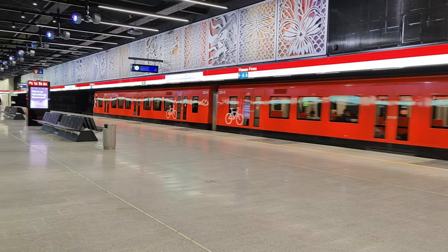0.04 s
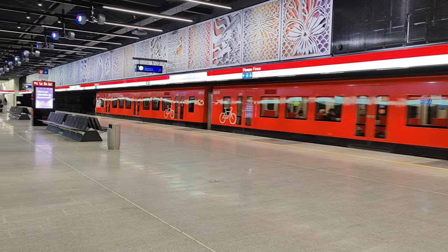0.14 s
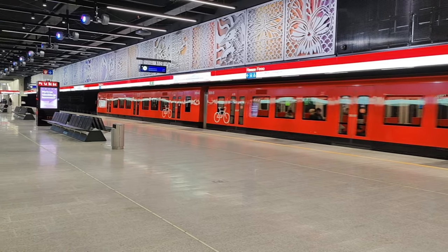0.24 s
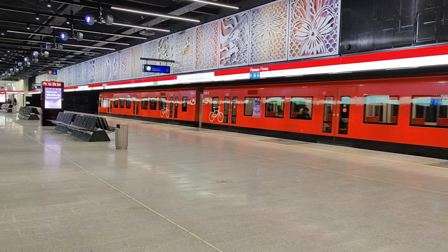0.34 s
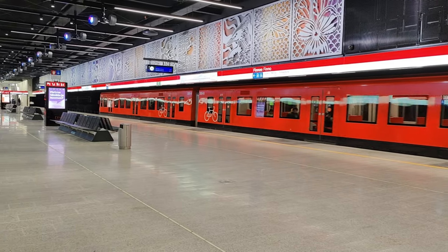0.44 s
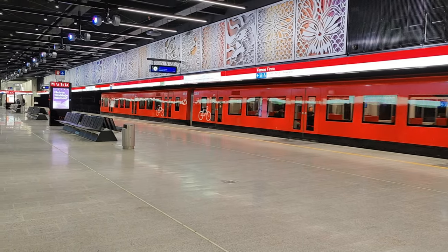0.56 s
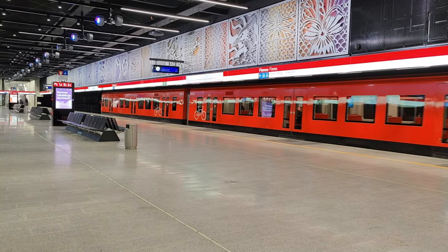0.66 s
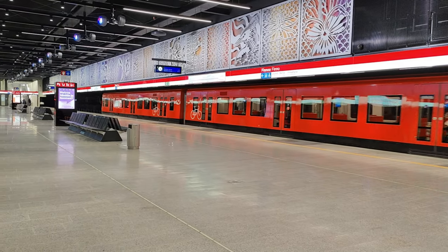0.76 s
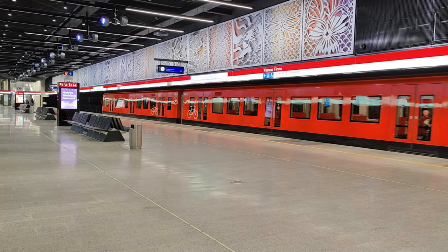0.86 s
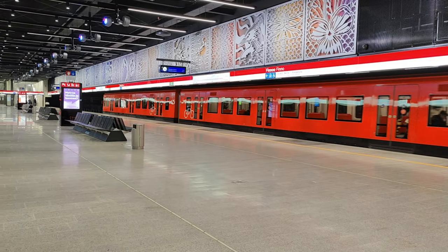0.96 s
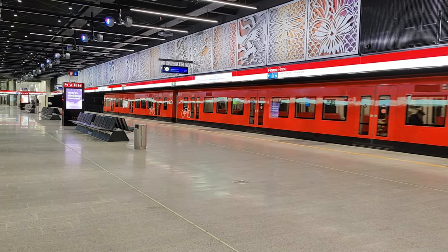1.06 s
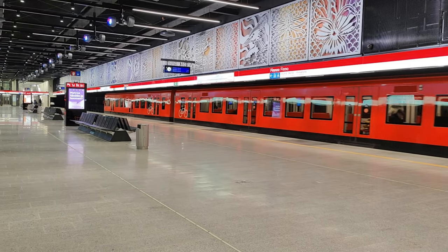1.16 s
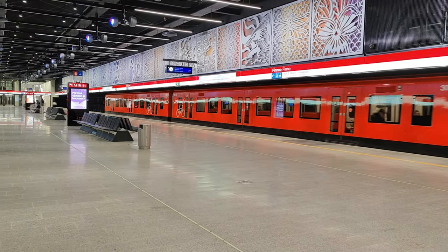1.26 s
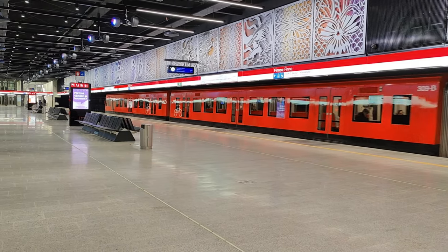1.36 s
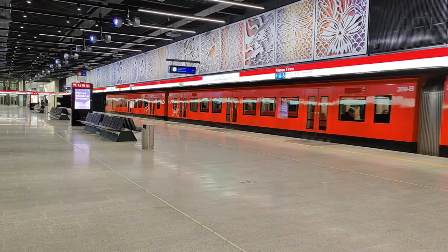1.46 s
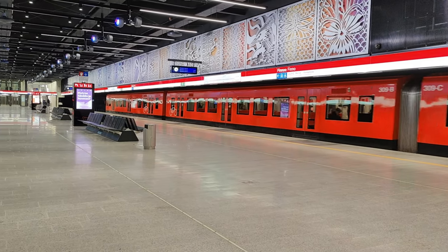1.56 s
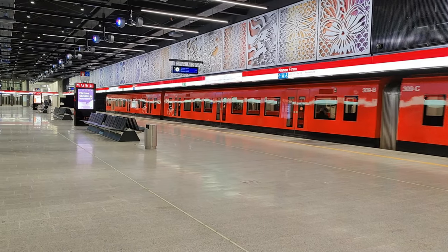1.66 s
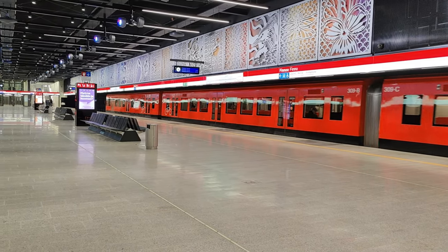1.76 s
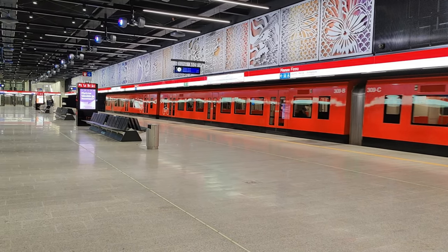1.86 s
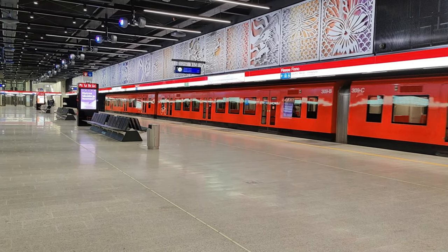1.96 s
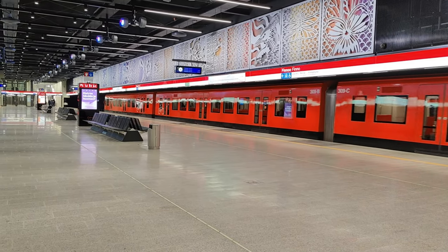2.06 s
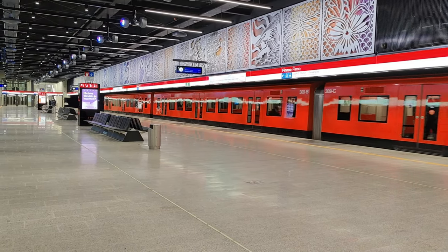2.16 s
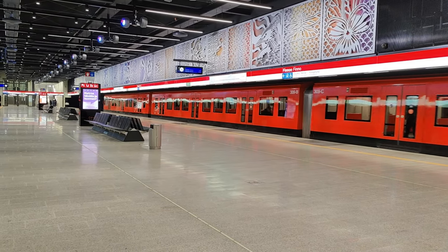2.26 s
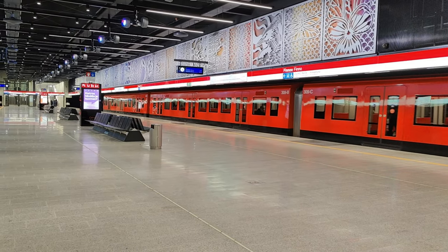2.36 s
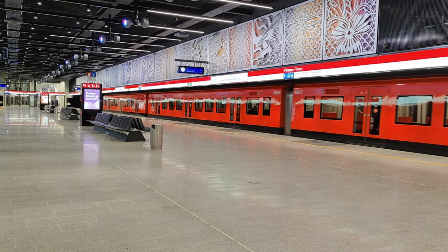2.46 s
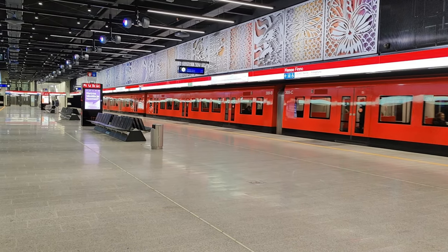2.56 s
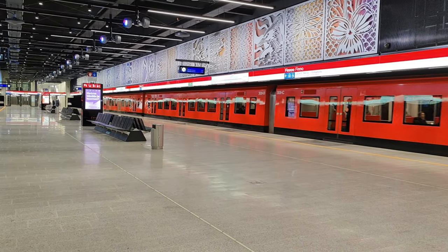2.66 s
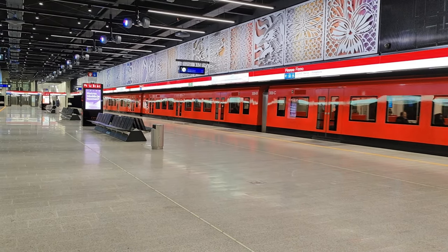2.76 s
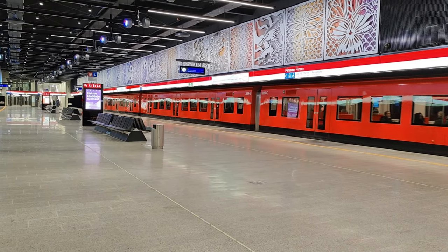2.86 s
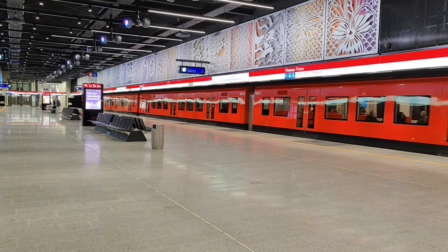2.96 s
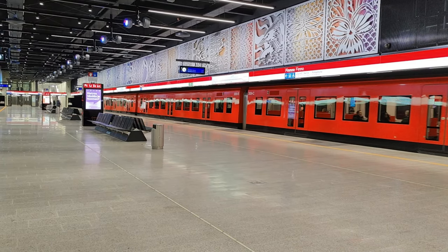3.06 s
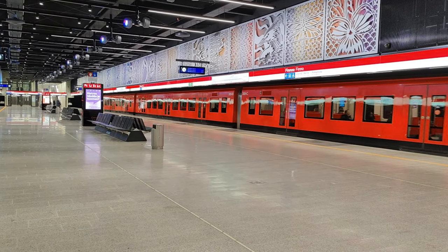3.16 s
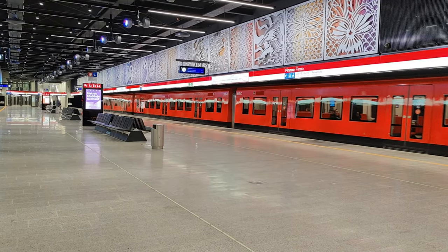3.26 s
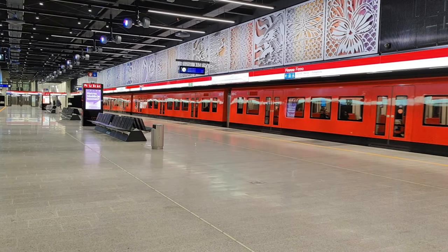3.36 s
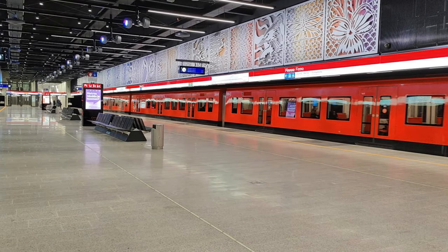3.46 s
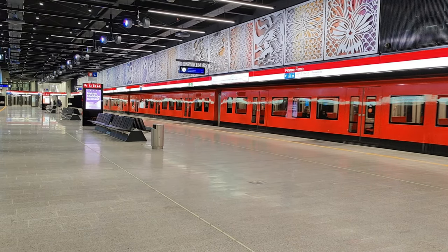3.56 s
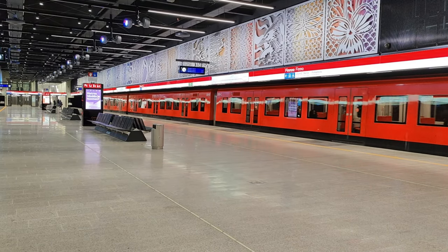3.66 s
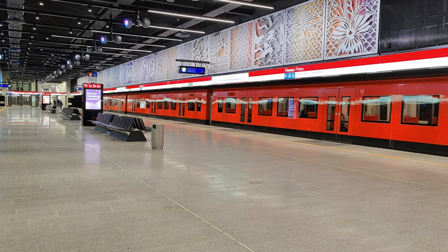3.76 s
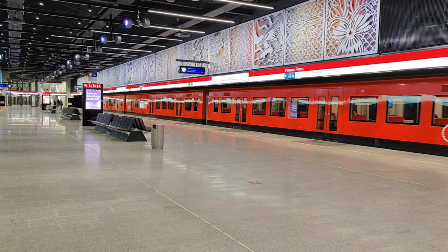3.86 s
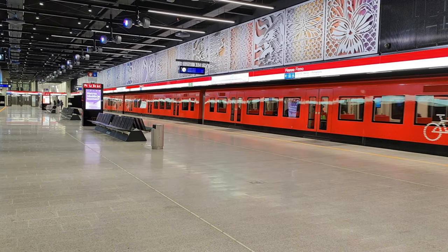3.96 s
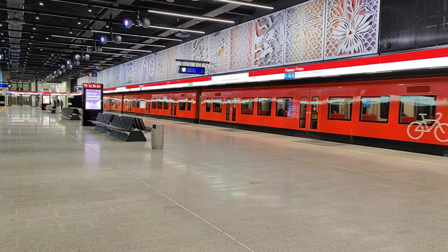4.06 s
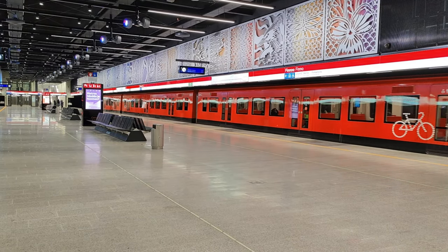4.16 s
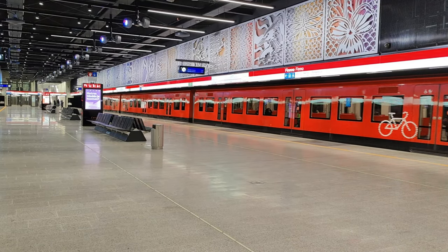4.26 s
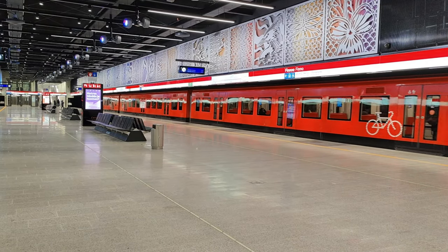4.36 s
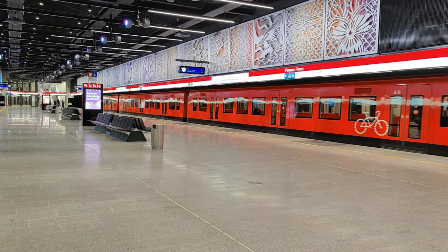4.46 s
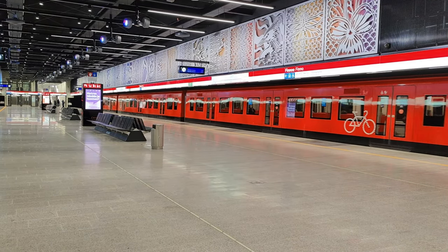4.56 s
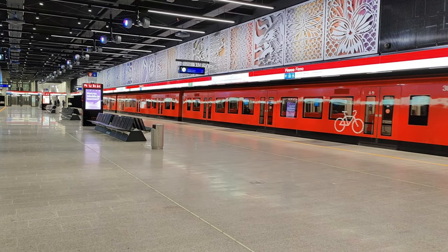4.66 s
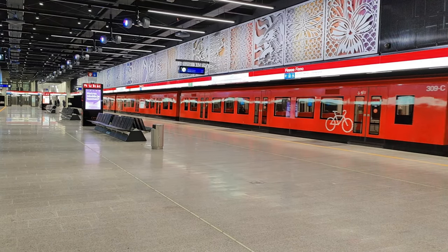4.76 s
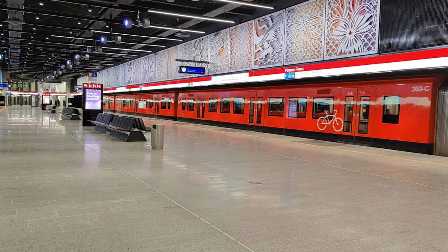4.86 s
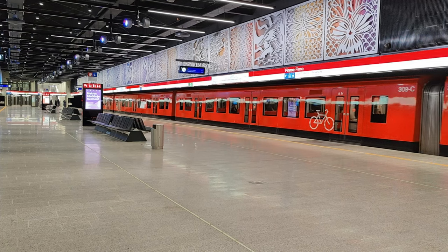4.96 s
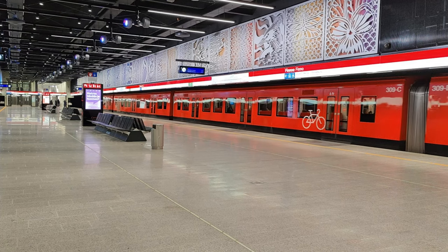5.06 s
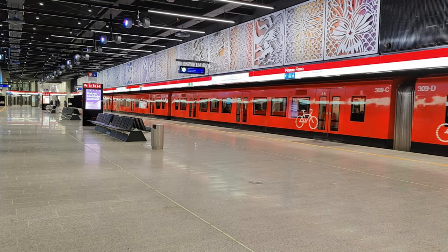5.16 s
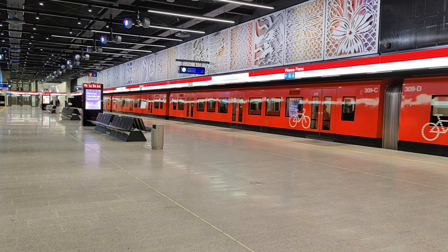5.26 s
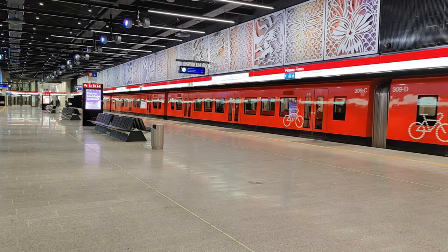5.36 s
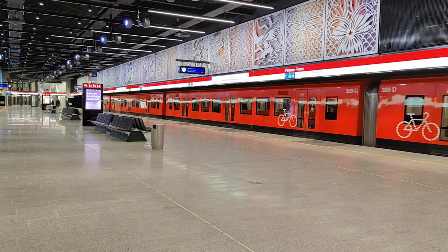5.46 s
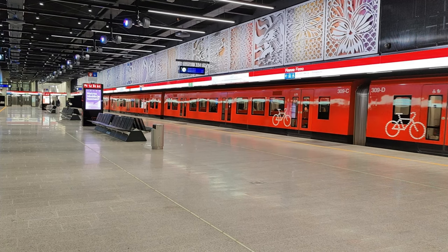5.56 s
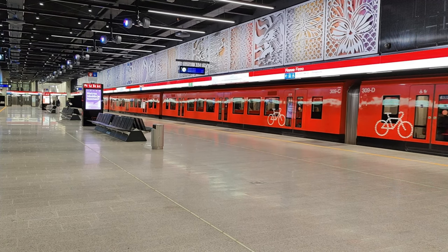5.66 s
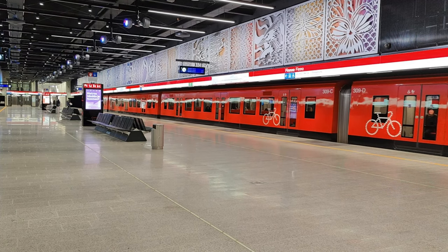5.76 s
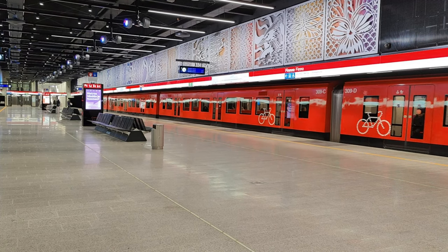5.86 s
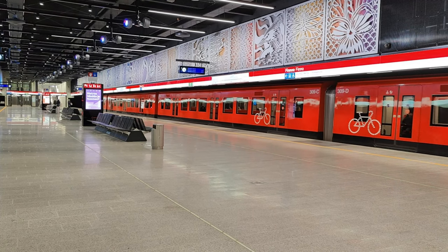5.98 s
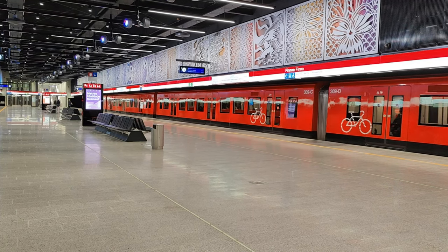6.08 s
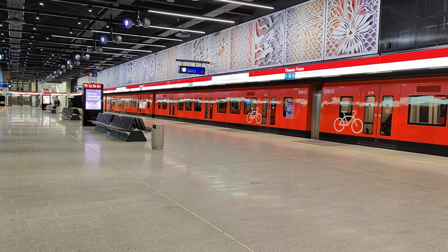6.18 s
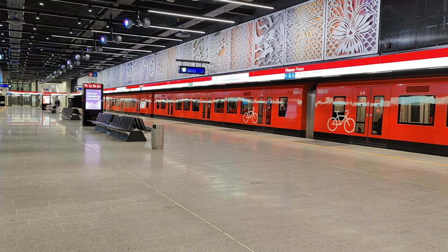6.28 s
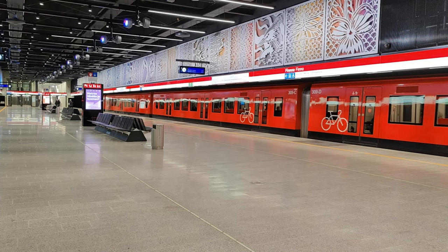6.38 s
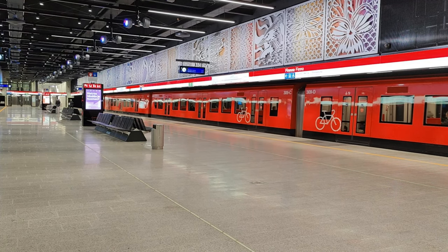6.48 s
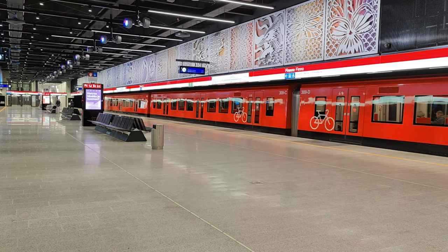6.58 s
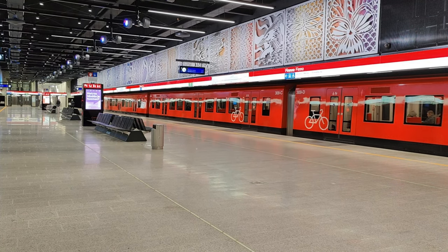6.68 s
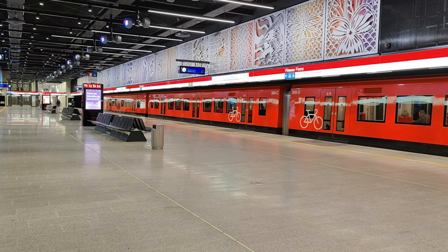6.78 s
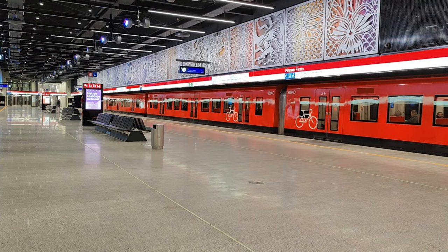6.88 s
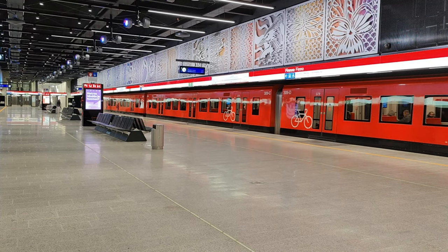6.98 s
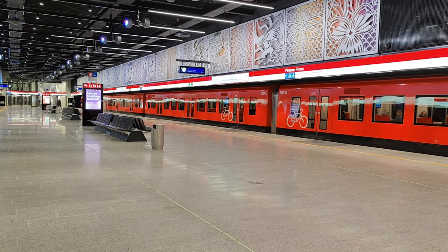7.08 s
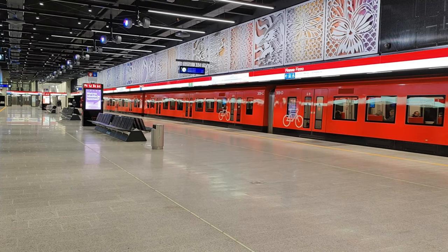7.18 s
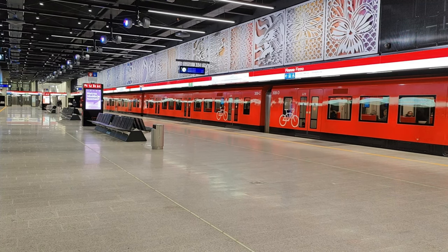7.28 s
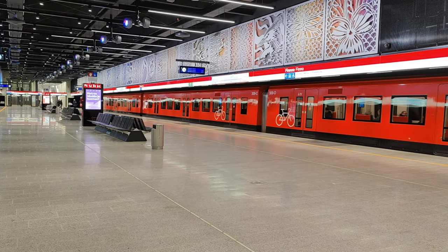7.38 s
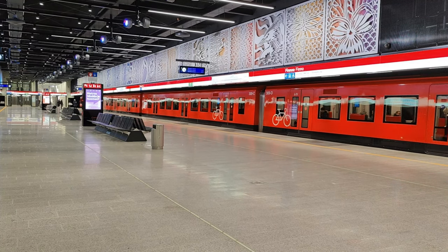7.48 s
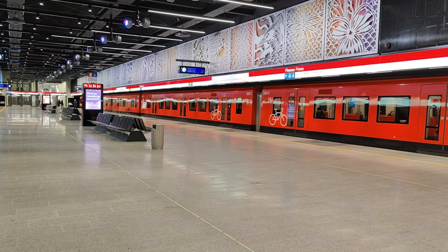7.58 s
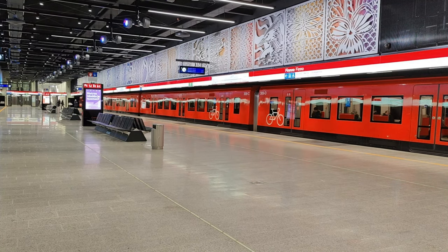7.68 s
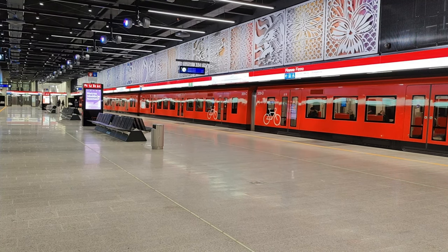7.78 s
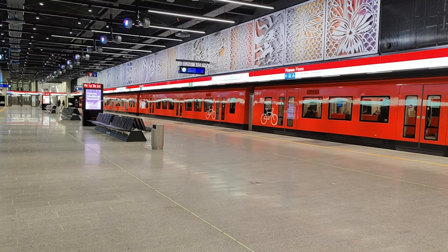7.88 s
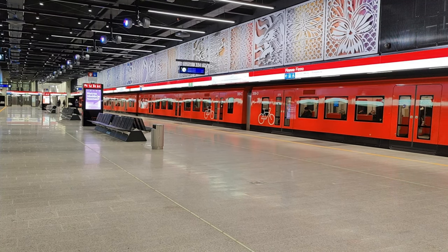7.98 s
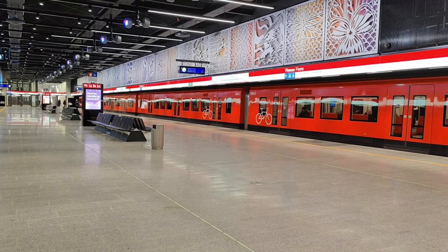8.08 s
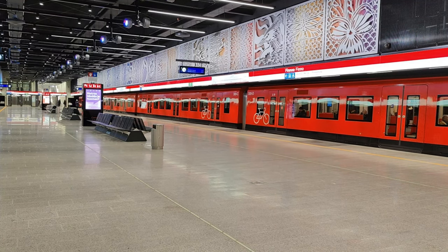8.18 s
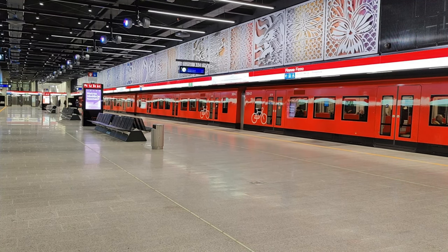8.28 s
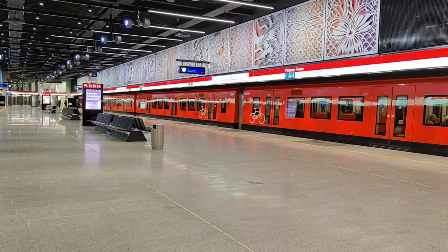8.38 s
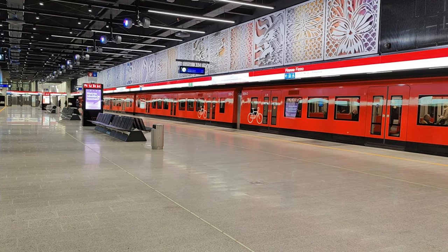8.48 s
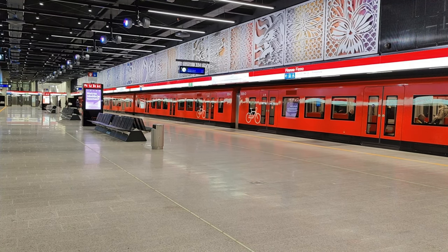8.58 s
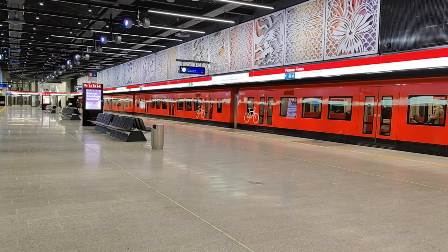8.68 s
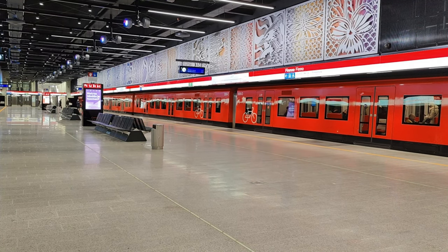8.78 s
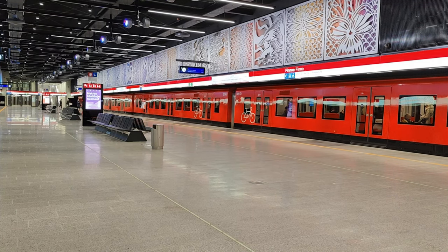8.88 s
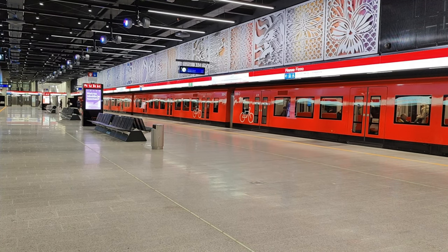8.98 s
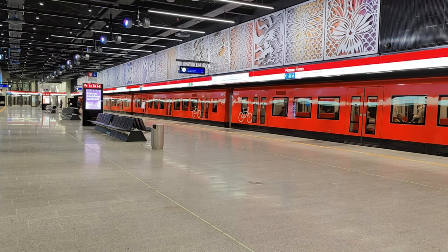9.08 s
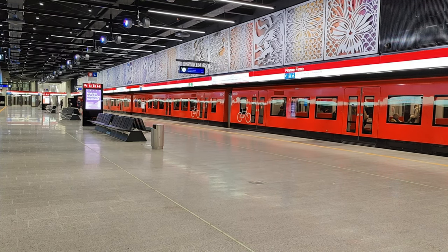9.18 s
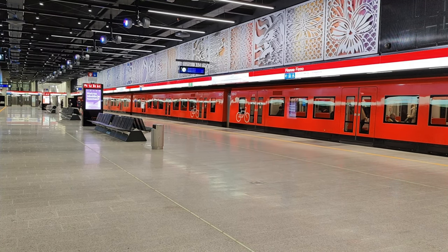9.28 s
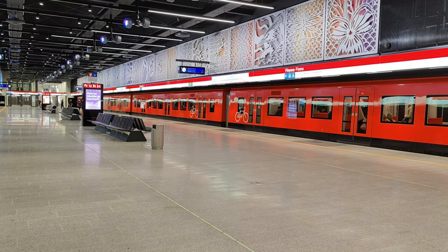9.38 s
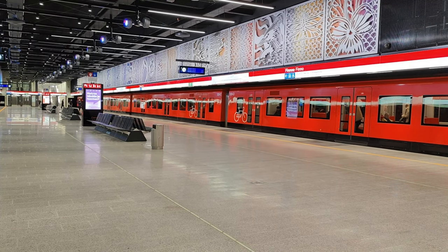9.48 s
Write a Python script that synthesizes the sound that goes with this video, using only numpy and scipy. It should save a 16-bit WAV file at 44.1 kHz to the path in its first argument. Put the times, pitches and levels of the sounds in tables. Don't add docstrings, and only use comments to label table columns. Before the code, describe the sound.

Deep rolling rumble and wheel hiss of a braking metro train fade gradually, with a wavering electric whine falling through a reverberant station.

```python
import sys
import numpy as np
from scipy import signal
from scipy.fft import rfft, irfft, next_fast_len
from scipy.io import wavfile
from scipy.ndimage import uniform_filter1d

SR = 44100
rng = np.random.default_rng(int(sys.argv[2]) if len(sys.argv) > 2 else 0)


def persist_wave(psi):
    counts = np.round(np.clip(psi, -1, 1) * 32767).astype(np.int16)
    wavfile.write(sys.argv[1], SR, np.atleast_2d(counts).T)


def convert_level_to_amplitude(level_db):
    exponent = np.asarray(level_db, float) / 20
    return 10 ** exponent


N = 420252
SIZE = next_fast_len(N + 2 * SR)
HZ = np.maximum(np.arange(SIZE // 2 + 1) * SR / SIZE, 1.0)

# (frequency [Hz], density [dB per Hz])
ROAR_TONE = [(41, -39), (70, -3.5), (85, -9.5), (102, 0.5), (123, 1.5), (150, -0.5), (194, -5), (277, -1.5),
             (316, -8), (415, -8.5), (632, -17), (779, -15.5), (960, -12.5), (1300, -28), (1600, -28),
             (2080, -38.5), (3520, -120)]
# (level [dB], level slope [dB per dB of speed],
# brightness [dB per octave], brightness slope [dB per octave per dB of speed])
ROAR_LAW = (-14.5, 1.29, 2, 0.23)
# (time [s], length [s], level [dB] and brightness [dB per octave])
UNPOWERED_CAR = [
    (6.2, 0.94, -1.5),
]


def roar():
    level_db, tilt_db = by_speed(ROAR_LAW)
    dull_db = swells(UNPOWERED_CAR)
    curves = (level_db + dull_db, tilt_db + dull_db)
    return wash(ROAR_TONE, curves, np.geomspace(110, 1100, 6), patchy_db=0.94, patch_rate=4.5)


# (frequency [Hz], density [dB per Hz])
RUMBLE_TONE = [(6, -64), (12, -26), (18, -5.5), (27, 19.5), (38, 9.5), (60, 8), (80, -16), (110, -39),
               (200, -120)]
# (level [dB], level slope [dB per dB of speed],
# brightness [dB per octave], brightness slope [dB per octave per dB of speed])
RUMBLE_LAW = (-21, 1, 0, 0)
# (time [s], lift [dB])
HEAVES = [
    (1.1, 1),
    (3.3, 3.5),
    (4.1, 2),
    (6.3, 5),
    (7.3, 3),
]


def rumble():
    heave_s = 0.29
    level_db = by_speed(RUMBLE_LAW)[0] + swells([(s, heave_s, db) for s, db in HEAVES])
    shaking = wash(RUMBLE_TONE, (0, 0), np.array([30., 60.]), patchy_db=-3.5, patch_rate=1.9)
    power = uniform_filter1d(uniform_filter1d(shaking ** 2, size=5000), size=5000)
    return convert_level_to_amplitude(level_db) * shaking / np.sqrt(power)


# (frequency [Hz], density [dB per Hz])
HISS_TONE = [(500, -96), (1000, -31), (1300, -22), (2050, -4.5), (2500, -1.5), (2850, 0.5), (3150, 2.5),
             (3600, -3), (4000, -2.5), (5300, -7), (6300, -7), (7000, -13), (7600, -28), (9500, -100)]
AIR_TONE = [(4470, -35), (7600, -12), (7880, -3.5), (8710, 1), (11000, -6), (15100, -10), (15700, -8)]
# (level [dB], level slope [dB per dB of speed],
# brightness [dB per octave], brightness slope [dB per octave per dB of speed])
HISS_LAW = (-27.5, 2.13, -7, 0.12)
AIR_LAW = (-58, 1, -3.5, -0.6)
# (time [s], length [s], lift [dB])
ROUGH_WHEELS = [
    (1.3, 0.51, 2.5),
    (3.9, 0.17, 1),
    (7.2, 0.5, 2),
]


def hiss():
    rough_bright, rough_air = 1, 1.1
    level_db, tilt_db = by_speed(HISS_LAW)
    air_db, air_tilt_db = by_speed(AIR_LAW)
    rough_db = swells(ROUGH_WHEELS)
    body_curves = (level_db + rough_db, tilt_db + rough_bright * rough_db)
    body = wash(HISS_TONE, body_curves, np.geomspace(1500, 6500, 5), patchy_db=1.46, patch_rate=8.1)
    air_curves = (air_db + rough_air * rough_db, air_tilt_db)
    air = wash(AIR_TONE, air_curves, np.array([9000., 11500., 14500.]), patchy_db=1.3, patch_rate=8.3)
    return body + air


# (time [s], switching pitch [Hz], level [dB])
DRIVE = [(0, 1292, -37.5), (2.5, 1301, -39.5), (3.6, 1270, -42.5), (4.05, 1245, -36), (4.35, 1197, -37),
         (5, 1132, -41), (5.6, 1075, -38.5), (6.4, 1028, -42.5), (7, 991, -43), (8, 929, -44),
         (9, 888.6, -46), (9.53, 856, -45.5)]
# (multiple of the switching pitch [1], level [dB])
DRIVE_ORDERS = [(2, 4.5), (3, -8), (4, 0.5), (5, -13), (6, 2), (7, -15), (8, 6), (9, -14), (10, 7), (11, 2),
                (12, 4), (13, -2), (14, 1), (15, -6), (16, -2), (17, -8), (18, -4)]
# (frequency [Hz], gain [dB])
CASING = [(1700, -6.5), (2150, 0), (2600, -1), (3200, 11), (3600, 8), (4300, -1), (5000, -6), (6000, -1),
          (6900, -17.5), (7600, -27), (8600, -29), (9250, -26), (9900, -32), (16000, -32)]
# (time [s], length [s], lift [dB])
SHARP_GROUP = [
    (4.9, .5, 11),
    (6.9, .6, 13.5),
]


def drive():
    t = np.arange(N) / SR
    pitch_hz, level_db = in_time(DRIVE)
    fall = np.log2(pitch_hz[0] / pitch_hz)
    locked = .5 + .5 * np.tanh((t - 4.25) / .15)
    free = 1 - locked
    waver_hz = 100.1 * free + 30.16 * 2 ** (-1.7 * fall) * locked
    tilt_db = -5 * free + (-2.5 + 6 * fall) * locked
    overtones_db = -14 + 31 * fall
    turn = np.exp(2j * np.pi * np.cumsum(pitch_hz) / SR)
    sharp_share = .022
    sharp = np.exp(2j * np.pi * np.cumsum(sharp_share * pitch_hz) / SR)
    sharp_gain = convert_level_to_amplitude(-21 + swells(SHARP_GROUP))
    out = 0
    for order, db in DRIVE_ORDERS:
        blur = 3.0 * (order / 3) ** .75 * (1.7 if order % 2 else 1)
        both_groups = turn ** order * (1 + sharp_gain * sharp ** order)
        line = (wander(blur * waver_hz, count=3) * both_groups).real
        line_db = level_db + db + tilt_db * np.log2(order / 3) + overtones_db * (order > 7.5)
        out = out + convert_level_to_amplitude(line_db) * line
    return hall(out, convert_level_to_amplitude(at_hz(CASING, HZ)))


# (start [s], end [s])
SINGING_SPANS = [(4.1, 5.35), (5.5, 7.7), (.1, 4.3), (6.85, 7.95), (.5, 1.0), (1.0, 1.72), (-.2, .3),
                 (4.5, 5.05), (8.05, 8.6), (3.3, 4.4), (0, 2.6), (.4, 3.4), (2.2, 4.7), (-.2, 3.9)]
# (frequency [Hz], width [Hz], level [dB])
SINGING = [(144.7, 32, -21), (151.4, 30, -26.5), (2204, 52, -49), (3470, 50, -44), (4370, 300, -34.5),
           (4310, 340, -35.5), (5460, 780, -42.5), (9400, 520, -57), (9170, 360, -58), (469.4, 70, -26.5),
           (385.8, 80, -25.5), (975, 150, -30), (3164, 370, -34.5), (2570, 170, -33)]


def singing():
    t = np.arange(N) / SR
    out = np.zeros((3, N))
    for (start, end), (hz, width_hz, db) in zip(SINGING_SPANS, SINGING):
        to_edge_s = np.minimum(t - start, end - t)
        swell = np.sin(np.pi / 2 * np.clip(to_edge_s / .2, 0, 1)) ** 2
        mode = (wander(width_hz, count=3) * np.exp(2j * np.pi * hz * t)).real
        out += convert_level_to_amplitude(db) * swell * mode
    return out


# (frequency [Hz], level [dB], decay time T60 [s])
CLANK = [(3670, 2, .07), (4600, -5, .08), (5620, -6, .06), (5760, -5, .12), (5960, -3, .11),
         (6150, -7, .06), (6390, -10, .1)]
# (time [s], peak level [dB])
TICKS = [
    (2.797, -41),
    (5.08, -53),
    (5.741, -51),
    (6.26, -53),
    (7.983, -50),
]


def knocks():
    clank_s, clank_db, tick_db = 2.796, -27.5, -14
    out = np.zeros((3, N))
    t = np.arange(SR // 4) / SR
    for path, late_s in enumerate((0, .004, .007)):
        at = round((clank_s + late_s) * SR)
        for hz, db, t60 in CLANK:
            onset = 1 - np.exp(-t / .0015)
            ring = np.sin(2 * np.pi * (hz * t + rng.random())) * onset
            out[path, at:at + len(t)] += convert_level_to_amplitude(clank_db + db - 60 * t / t60) * ring
    for s, db in TICKS:
        at = round(s * SR)
        burst = np.diff(rng.standard_normal((3, len(t) + 1)))
        out[:, at:at + len(t)] += convert_level_to_amplitude(db + tick_db - 60 * t / .06) * burst
    return out


# (frequency [Hz], density [dB per Hz])
FANS_LOW = [(53, -42), (90, -1), (119, 4.5), (239, -9), (277, -4.5), (311, -39), (391, -28), (449, -5.5),
            (540, -5.5), (627, -1.5), (679, -4), (854, -24), (969, -9), (1400, -20.5), (1820, -44),
            (3080, -120)]
FANS_HIGH = [(760, -22), (1300, 5), (1770, 9), (1930, -11), (2630, -12), (3110, -41), (3550, -15),
             (4800, -30), (5310, -27), (5760, -20), (6870, -7), (7230, -25), (7500, -39), (9750, -72),
             (16500, -120)]


def fans():
    low = wash(FANS_LOW, (-31, 0), np.array([300., 900.]), patchy_db=-2.0, patch_rate=7.8)
    high = wash(FANS_HIGH, (-45, 0), np.array([2000., 5000.]), patchy_db=1.5, patch_rate=9.1)
    return low + high


def hall(field, colour):
    t60_s = 1.35
    tail = rng.standard_normal((3, 2 * SR)) * convert_level_to_amplitude(-60 * np.arange(2 * SR) / SR / t60_s)
    echo = rfft(tail / np.sqrt(np.sum(tail ** 2, axis=1, keepdims=True)), SIZE)
    echo[0] = 1
    return irfft(rfft(field, SIZE) * echo * colour, SIZE)[:, :N]


# (frequency [Hz], share [1])
DIRECT = [(100, 0.22), (500, 0.71), (1200, 0.31), (2000, 0.27), (6000, 0.37), (12000, 0.092)]
# (frequency [Hz], left minus right [dB])
LEFT_RIGHT = [(60, -0.5), (92, -0.5), (140, -1.5), (210, 1.5), (330, -3.5), (500, 2), (770, 0.5),
              (1170, -5), (1790, 2), (2740, -2), (4190, -3.5), (6410, -6.0), (9810, -4), (15000, -12.5)]


def ports(field):
    gap_m, left_lag_s, top_hz = 0.14, 0.0004653, 15790
    edge = 2048
    wide = np.pad(field, ((0, 0), (edge, edge)), "reflect")
    window = signal.windows.tukey(N + 2 * edge, 2 * edge / (N + 2 * edge))
    direct, common, apart = rfft(wide * window, SIZE)
    share = np.clip(at_hz(DIRECT, HZ), 0, 1)
    alike = np.sinc(2 * HZ * gap_m / 343)
    common = common * np.sqrt((1 + alike) / 2)
    apart = apart * np.sqrt((1 - alike) / 2)
    late = np.exp(-2j * np.pi * HZ * left_lag_s)
    left = np.sqrt(share) * direct * late + np.sqrt(1 - share) * (common + apart)
    right = np.sqrt(share) * direct + np.sqrt(1 - share) * (common - apart)
    lean = convert_level_to_amplitude(at_hz(LEFT_RIGHT, HZ) / 2)
    return irfft(np.array([left * lean, right / lean]) * (HZ < top_hz), SIZE)[:, edge:edge + N]


def by_speed(law):
    level_db, follows, tilt_db, dulls = law
    standstill_s = 14.2
    speed = np.maximum(1 - np.arange(N) / SR / standstill_s, .05)
    speed_db = 20 * np.log10(speed)
    return level_db + follows * speed_db, tilt_db + dulls * speed_db


def swells(rows):
    t = np.arange(N) / SR
    return sum(db * np.exp(-.5 * ((t - s) / length) ** 2) for s, length, db in rows)


def wash(tone, curves, centres, patchy_db, patch_rate):
    level_db, tilt_db = curves
    coloured = rfft(rng.standard_normal((3, SIZE))) * convert_level_to_amplitude(at_hz(tone, HZ))
    place = np.interp(np.log(HZ), np.log(centres), np.arange(len(centres)))
    flicker = wander(patch_rate, count=len(centres)).real
    scale = np.sqrt(np.mean(irfft(coloured[0], SIZE) ** 2))
    out = 0
    for k, hz in enumerate(centres):
        overlap = np.cos(np.pi / 2 * np.clip(place - k, -1, 1)) ** 2
        band = irfft(coloured * overlap, SIZE)[:, :N]
        octaves = np.log2(hz / centres[len(centres) // 2])
        out = out + band * convert_level_to_amplitude(level_db + tilt_db * octaves + patchy_db * flicker[k])
    return out / scale


def wander(width_hz, count):
    place = 6 * np.cumsum(width_hz + np.zeros(N)) / SR % 59000
    white = rng.standard_normal((2, count, 60000))
    r = np.exp(-np.pi / 4)
    smooth = signal.lfilter([1], [1, -2 * r, r * r], white[0] + 1j * white[1])
    return rms_one(np.array([np.interp(place, np.arange(len(v)), v) for v in smooth]))


def rms_one(x):
    return x / np.sqrt(np.mean(np.abs(x) ** 2) + 1e-20)


def in_time(rows):
    s, *columns = np.transpose(rows)
    return [np.interp(np.arange(N) / SR, s, c) for c in columns]


def at_hz(points, hz):
    table_hz, values = np.array(points).T
    return np.interp(np.log(hz), np.log(table_hz), values)


def scene():
    train = roar() + rumble() + hiss() + drive() + singing() + knocks()
    return ports(train + fans())


def top_cut(x):
    return signal.sosfilt(signal.butter(12, 15790, fs=SR, output="sos"), x)


def record(dry):
    n = np.arange(N)
    fade = np.clip(np.minimum(n / (0.001 * SR), (N - n) / (0.005 * SR)), 0, 1)
    return top_cut(dry * fade)


dry = scene()
out = record(dry)
persist_wave(out)
```